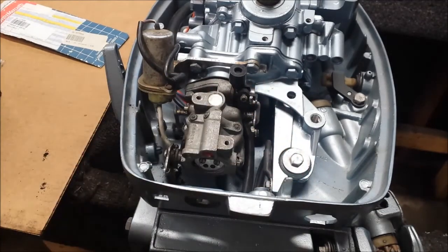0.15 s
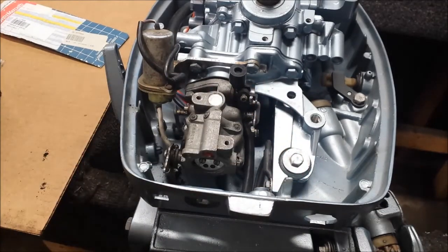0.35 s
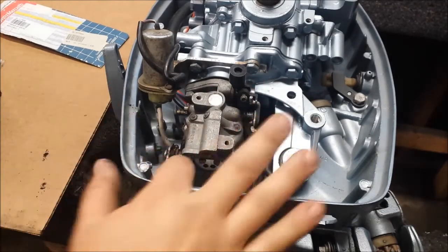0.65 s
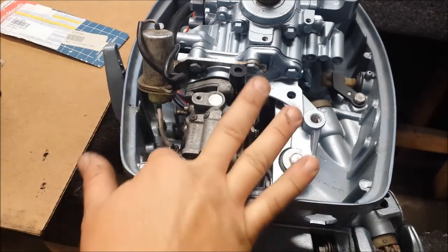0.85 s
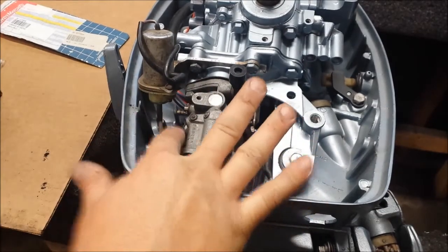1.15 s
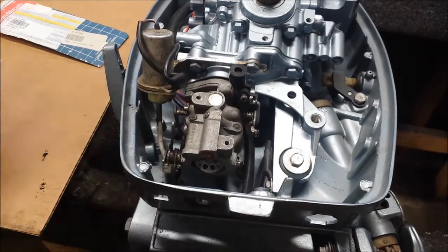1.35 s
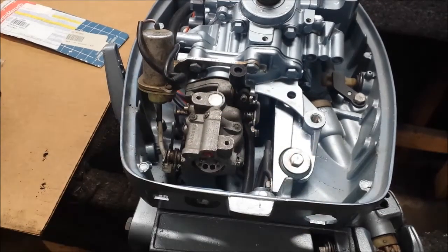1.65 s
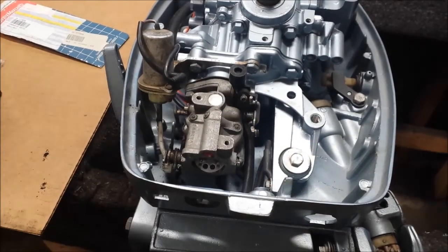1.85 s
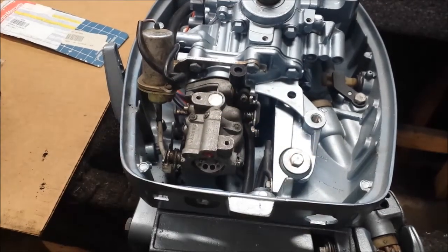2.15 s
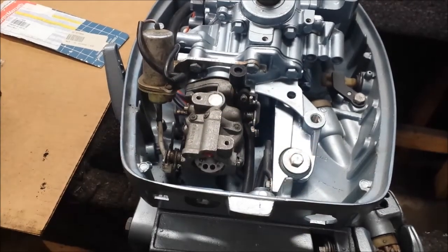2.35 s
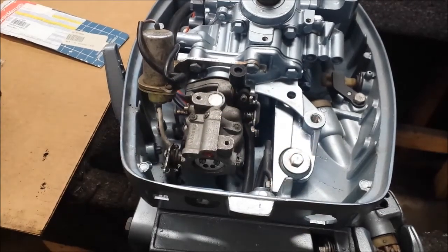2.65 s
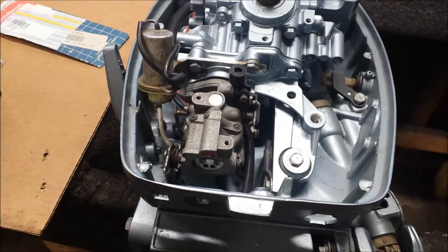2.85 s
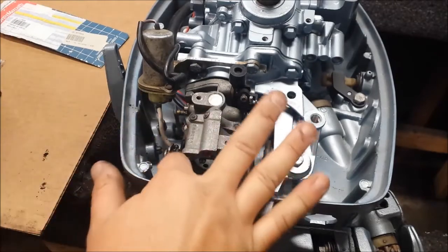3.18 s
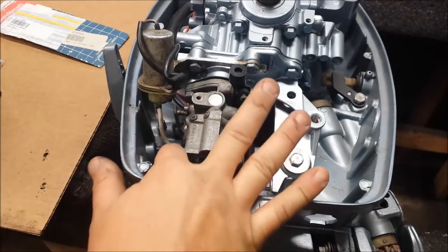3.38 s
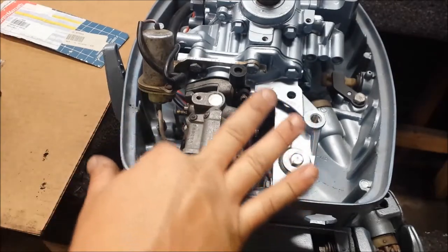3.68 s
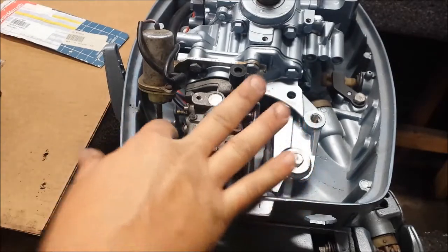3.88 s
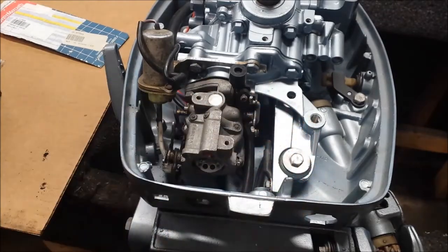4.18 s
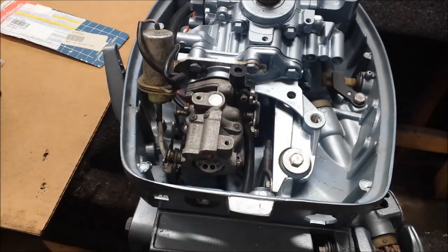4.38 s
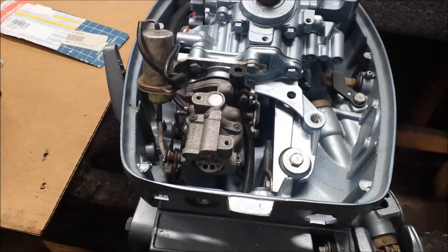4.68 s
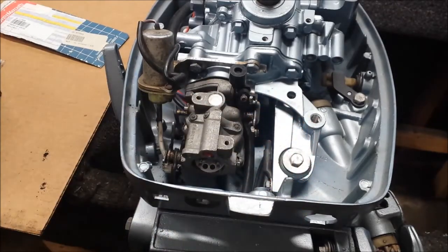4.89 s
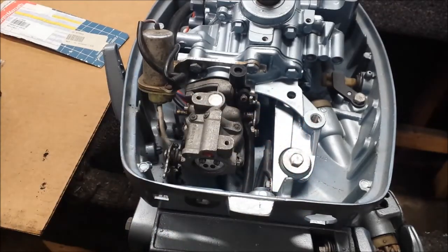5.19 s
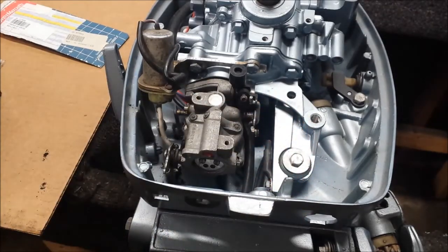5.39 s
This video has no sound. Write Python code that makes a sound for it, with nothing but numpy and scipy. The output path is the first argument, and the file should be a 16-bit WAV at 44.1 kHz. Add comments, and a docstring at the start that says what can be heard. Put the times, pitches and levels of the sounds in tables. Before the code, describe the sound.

An outboard motor's choke solenoid is heard close up in a quiet workshop, over a faint low hum and rumble. Right at the start comes the bright metallic ring of a clack already under way, then a light rattle at 0.2 seconds as the plunger drops back. The linkage squeaks faintly as a hand flips it, giving two crisp, lighter clicks at about 1.0 and 1.1 seconds. At 2.5 seconds the solenoid clacks sharply and rings briefly, with another small rattle at 2.7. Two soft knocks follow near 2.9 and 3.4 seconds. Another tiny squeak leads into a second pair of clicks at about 3.8 and 3.9 seconds. A last loud, ringing clack lands at 5.1 seconds, and the plunger rattles softly back at 5.4. The room adds only a slight echo.

```python
"""An outboard motor's choke solenoid (an electric magnet that pulls a plunger) clacks three times.
It sits close by on a workshop bench. Each time the plunger slams home, the metal rings, and about a
quarter second later the plunger drops back with a light rattle. Between pulls a hand flips the choke
linkage (its rods and joints) back with a squeak and two clicks. A faint hum fills the room."""
import sys
import numpy as np
from scipy import signal
from scipy.fft import rfft, irfft, next_fast_len
from scipy.io import wavfile
from scipy.ndimage import uniform_filter1d, map_coordinates

SR = 44100
rng = np.random.default_rng(int(sys.argv[2]) if len(sys.argv) > 2 else 0)


def unload_audio(sound):
    """Save the sound as a 16-bit wav file, at the path given as the first command line argument."""
    columns = np.transpose(np.atleast_2d(sound))
    # keep every value between -1 and 1, then stretch to whole-number steps
    steps = np.round(np.clip(columns, -1, 1) * 32767)
    wavfile.write(sys.argv[1], SR, steps.astype(np.int16))


N = 243873
T = np.arange(SR) / SR  # the second after a hit
HZ = np.fft.rfftfreq(SR, 1 / SR)  # the frequencies in a one-second sound

# The plunger pulls in: (time [s], level [dB], brightness [dB per octave], clang near 4 kHz [dB],
# metal ring [dB], rod ring [dB], chatter length [s])
PULLS = [(-.024, -8.5, 0, 4, -17, -44.5, 0.0043), (2.4514, -15, -0.5, -3.5, -21.5, -38.5, .0016),
         (5.1188, -15.5, -1, 3.5, -20.5, -51, .003)]
# The plunger is let go and drops back: (time [s], level [dB])
RELEASES = [(0.2047, -49), (2.6677, -50), (5.3773, -53.5)]
# Ringing tones of the motor's lower pan: (pitch [Hz], level [dB], time to fade by 60 dB [s])
PAN_TONES = [(120, -9, 0.46), (157.9, -3, 0.45), (261.5, -6.5, .3), (322, -14.5, .25), (655, -0.5, 0.22),
             (720, 8.5, 0.037), (795, 6, 0.031)]
# Tone colour of the rattling rods: (frequency [Hz], level [dB])
RATTLE_COLOUR = [(400, -13.5), (660, -2), (850, -4.5), (1500, -10), (2100, -4), (2700, -3.5), (3500, -12),
                 (4300, -7), (4900, -9), (5900, -4.5), (6900, -4), (7800, -13), (10000, -26), (15000, -30)]


def amp(db):
    """Turn decibels into a factor to multiply by."""
    return 10 ** (np.asarray(db) / 20)


def unit(x):
    """Scale to an average strength (rms) of 1."""
    return x / np.sqrt(np.mean(x ** 2) + 1e-20)


def along(points, hz):
    """Read values between (frequency, value) points, spacing the octaves evenly."""
    freqs, values = np.transpose(points)
    return np.interp(np.log(hz + 1), np.log(freqs + 1), values)


def add(track, s, sound):
    """Mix a sound into the track, starting at s seconds."""
    start = round(s * SR)
    part = sound[max(-start, 0):len(track) - start]
    track[max(start, 0):][:len(part)] += part


def wobble(rate):
    """A smooth random curve through `rate` random points a second."""
    return unit(map_coordinates(rng.standard_normal(N // 100), [np.arange(N) * rate / SR + 2]))


def noise(colour):
    """Steady noise with the given tone colour."""
    gain = amp(along(colour, np.fft.rfftfreq(N, 1 / SR)))
    return unit(irfft(rfft(rng.standard_normal(N)) * gain, N))


def resonances(peaks):
    """How strongly an object answers each frequency: most near its own pitches."""
    return np.sqrt(sum(amp(db) ** 2 * (HZ * width) ** 2 / ((hz * hz - HZ ** 2) ** 2 + (HZ * width) ** 2)
                       for hz, width, db in peaks))


def causal(gain):
    """A filter with this gain that rings only after a hit, never before it."""
    cepstrum = irfft(np.log(np.maximum(gain / gain.max(), 1e-5)))
    cepstrum[1:SR // 2] *= 2
    cepstrum[SR // 2 + 1:] = 0
    return np.exp(rfft(cepstrum))


def contact(body, tilt_db, hold, t60):
    """Parts chatter for `hold` seconds, fade by 60 dB in `t60` seconds and set an object sounding."""
    chatter = rfft(rng.standard_normal(SR) * amp(-60 * np.maximum(T - hold, 0) / t60))
    unevenness = np.sqrt(np.abs(uniform_filter1d(np.abs(chatter) ** 2, size=300)))
    brightness = amp(tilt_db * np.log2(HZ + 20))
    hit = irfft(chatter * causal(body * brightness / unevenness))  # a hard hit feeds all pitches evenly
    return unit(hit) * np.sqrt(.005)  # as much energy as 5 ms at strength 1


def ring(tones):
    """Struck metal rings with fading tones, in a slightly new balance every time."""
    gains = amp([db for hz, db, t60 in tones] + rng.normal(0, 2, len(tones)))
    waves = [np.sin(2 * np.pi * (hz * T + rng.random())) * amp(-60 * T / t60) for hz, db, t60 in tones]
    return gains @ waves / np.sqrt(np.sum(gains ** 2) / 2) * (1 - np.exp(-T / 0.0048))


def tail(rise):
    """A wash of noise that builds over `rise` seconds; its bass and treble die before its middle."""
    # How long sound lingers: (frequency [Hz], time to fade by 60 dB [s])
    fade_times = [(150, 0.2), (1000, 0.44), (4500, 0.43), (8000, .29), (12000, 0.31)]
    hz, t, bands = signal.stft(rng.standard_normal(SR + 256), SR, nperseg=256)
    fade = amp(-60 * t / along(fade_times, hz)[:, None])
    wash = signal.istft(bands * fade, SR, nperseg=256)[1][:SR]
    return wash * (1 - np.exp(-T / rise))


def workshop():
    """A low drone, mains buzz and a distant motor hum over rumble and hiss."""
    # Level of the whole background: hum, rumble and hiss dip and recover together,
    # as under a recorder's noise suppression: (time [s], level [dB])
    background_levels = [(0, 0), (.25, 0), (.53, -7), (.88, -5.5), (1.08, 2), (1.35, -1.5), (2.65, 0),
                         (3.6, -2.5), (3.92, 2), (4.2, -4), (4.8, -2.5), (5.06, -7), (5.28, 0.5),
                         (5.53, -3.5)]
    # The distant motor's tones: (multiple of its pitch, starting level [dB])
    motor_tones = [(.625, -60.5), (.862, -60.5), (1, -51.5)]
    # Tone colours of the room's rumble and hiss: (frequency [Hz], level [dB])
    rumble_colour = [(10, -12), (25, -12.5), (42, -13), (55, -8.5), (85, -5), (120, -7.5), (165, -8.5),
                     (250, -12.5), (400, -20.5), (750, -21.5), (1200, -27), (3000, -41), (6000, -78)]
    hiss_colour = [(500, -20.5), (1500, 1), (3000, 2), (6500, 3), (9000, 0.5), (15500, 1)]
    t = np.arange(N) / SR
    level_db = np.interp(t, *np.transpose(background_levels))
    drone_hz, mains_hz, start_hz, waver_hz = 65.7, 120, 133.3, 0.6
    eased = (1 + np.tanh(2 * (t - 2.8) / .45)) / 2  # midway the motor eases off, lower and quieter
    motor_hz = start_hz - 1.3 * t - 9.2 * eased + waver_hz * wobble(rate=4.1)
    recede_db_per_s = 1  # the motor moves away
    tones = [(drone_hz + waver_hz * wobble(rate=10), -58.5), (np.full(N, mains_hz), -65)]
    tones += [(multiple * motor_hz, db - 3.5 * eased - recede_db_per_s * t)
              for multiple, db in motor_tones]
    hum = sum(amp(db + 0.1 * wobble(rate=5.8)) * np.sin(2 * np.pi * np.cumsum(hz) / SR)
              for hz, db in tones)
    rumble = amp(-58.5 + 0.5 * wobble(rate=7)) * noise(rumble_colour)
    hiss = amp(-68) * noise(hiss_colour)
    return amp(1.5 * level_db) * hum + amp(level_db) * rumble + amp(.62 * level_db) * hiss


def room(sound, echo_db):
    """The bench and walls add a faint echo to a close sound."""
    # Tone colour of the echo: (frequency [Hz], level [dB])
    wall_colour = [(200, 4), (700, 3), (1100, 0.5), (1600, 2.5), (2200, -3.5), (2750, -8.5), (3600, -4),
                   (8000, -0.5)]
    echo = tail(rise=0.0037)
    echo = irfft(rfft(echo / np.linalg.norm(echo)) * causal(amp(along(wall_colour, HZ))))
    return sound + amp(echo_db) * signal.fftconvolve(sound, echo)[:N]


def pivot():
    """The dry pivot sticks and slips as it turns, squeaking at a wavering pitch."""
    # The pivot's squeaks: (middle time [s], length [s], level [dB])
    squeaks = [(0.755, 0.11, -77), (.893, 0.079, -65.5), (1.225, .06, -65), (3.466, .08, -77),
               (3.722, .16, -68.5)]
    # The pivot's own pitches: (pitch [Hz], width [Hz], level [dB])
    pivot_peaks = [(1630, 100, -13), (2630, 600, -21), (6240, 650, -22)]
    out = np.zeros(N)
    for s, length, db in squeaks:
        rub = unit(irfft(rfft(rng.standard_normal(SR)) * resonances(pivot_peaks) ** 2))
        pitch = pivot_peaks[0][0] + 25 * unit(uniform_filter1d(rng.standard_normal(SR), size=300))
        squeal = np.sin(2 * np.pi * np.cumsum(pitch) / SR)
        swell = np.sin(np.pi * np.minimum(T / length, 1))
        add(out, s - length / 2, amp(db) * (squeal + 0.88 * rub) * swell)
    return out


def tick(tilt_db):
    """The rods touch lightly and chatter on briefly; a higher tilt_db sounds brighter."""
    rods = amp(along(RATTLE_COLOUR, HZ))
    touch = contact(rods, tilt_db, hold=.001, t60=.012)
    return touch + amp(0.5) * contact(rods, tilt_db, hold=.002, t60=.07)


def rattles():
    """The plunger slides in and later drops back; loose joints tick, and something knocks softly."""
    # Ticks of loose joints: (time [s], level [dB], brightness [dB per octave])
    joint_ticks = [(.258, -64, 8), (1.332, -66.5, 3), (3.833, -55, 0.5), (4.0947, -65.5, 7)]
    # Soft knocks nearby: (time [s], level [dB])
    knocks = [(.424, -63), (2.9204, -50.5), (3.416, -57)]
    # Tone colour of a knock: (frequency [Hz], level [dB])
    knock_colour = [(300, -23), (700, 9), (1100, 2.5), (1900, -4), (2800, -26), (8000, -38.5)]
    out = np.zeros(N)
    dull_scrape = amp(along(RATTLE_COLOUR, HZ)) / np.sqrt(1 + (HZ / 2400) ** 6)
    for s, db, *_ in PULLS:
        add(out, s - .0188, amp(db - 38) * tick(tilt_db=-1))  # the rods stir just before the pull
        add(out, s - .0054, amp(db - 25.5) * contact(dull_scrape, 0, hold=0.0019, t60=0.036))
    for s, db in RELEASES:
        add(out, s - .005, amp(db - 12) * tick(tilt_db=0.4))  # the plunger comes loose
        for delay, drop_db in [(0, 0), (0.014, -3)]:  # it lands and bounces once
            thud = amp(-5.5) * ring(PAN_TONES[:-2])  # too light for the pan's hollow knock
            add(out, s + delay, amp(db + drop_db) * (tick(tilt_db=0.8) + thud))
    for s, db, tilt_db in joint_ticks:
        add(out, s, amp(db) * tick(tilt_db))
    for s, db in knocks:
        add(out, s, amp(db) * contact(amp(along(knock_colour, HZ)), 0, hold=0.0014, t60=0.092))
    return out


def linkage():
    """Pushed by hand, the linkage snaps off its catch and lands on its stop, shaking the pan."""
    # Snaps off the catch: (time [s], level [dB], brightness [dB per octave], hollowness [dB])
    snaps = [(0.9525, -32, 3.5, 1.5), (3.7586, -33.5, -0.5, -7)]
    # Landings on the stop: (time [s], level [dB])
    landings = [(1.1075, -32.5), (3.885, -32)]
    # The catch's and the stop's own pitches: (pitch [Hz], width [Hz], level [dB])
    catch_peaks = [(1010, 110, -8.5), (1188, 85, 1.5), (1560, 160, -3), (1990, 260, -21), (2650, 150, 5),
                   (2700, 67, 1), (4555, 200, -1.5), (5150, 190, -3), (6300, 650, -9.5), (7430, 790, -10.5),
                   (8710, 600, -24), (12470, 1100, -36)]
    stop_peaks = [(413, 30, -12), (693, 23, 1.5), (724, 47, -1), (1096, 60, -4.5), (1234, 20, -8),
                  (2010, 140, -13), (2300, 180, -10), (2680, 230, 0), (2940, 160, -4), (3460, 100, -15),
                  (4500, 180, -11), (5760, 910, -12), (6775, 930, -16.5), (13090, 2500, -23)]
    out = np.zeros(N)
    catch = resonances(catch_peaks) * amp(along([(300, -29), (900, 13), (7000, -1.5), (11000, -5)], HZ))
    stop = resonances(stop_peaks) * amp(along([(200, -1.5), (700, -0.5), (6500, 0), (10000, -8.5)], HZ))
    hollow = np.exp(-(np.log2((HZ + 1) / 1580) / 0.18) ** 2)
    for s, db, tilt_db, hollow_db in snaps:
        struck = catch * amp(hollow_db * hollow)
        add(out, s, amp(db) * contact(struck, tilt_db, hold=0.00088, t60=0.011))
        # loose joints chatter on; a power below 1 makes them ring less
        add(out, s + 0.0059, amp(db - 12) * contact(struck ** 0.85, tilt_db, hold=0.0088, t60=0.033))
    for s, db in landings:
        click = contact(stop, 0, hold=0.0006, t60=0.028)
        add(out, s, amp(db) * (click + amp(-5) * ring(PAN_TONES)))
        add(out, s + 0.014, amp(db - 16.5) * contact(stop ** 0.61, 0, hold=.003, t60=0.053))
    return out


def solenoid():
    """The plunger slams home and leaves the metal ringing until it drops back and damps the ring."""
    # The solenoid body's own pitches: (pitch [Hz], width [Hz], level [dB])
    body_peaks = [(703, 100, -18.5), (850, 40, -7), (1014, 46, 0.5), (1183, 64, -2), (1510, 71.6, -6),
                  (2050, 110, -13), (2400, 150, -8), (2850, 200, -5), (3860, 44, -8.5), (4570, 280, 0.5),
                  (4390, 130, 2.5), (5023, 69, 0), (5310, 180, -1), (6630, 300, -7), (6500, 150, -5),
                  (7580, 180, 2.5), (8320, 530, -1), (8800, 120, -6), (10700, 1300, -18.5),
                  (12700, 2000, -13.5), (14730, 400, -18.5)]
    # Tones of the metal casting and the choke rods: (pitch [Hz], level [dB], time to fade by 60 dB [s])
    metal_tones = [(2837, -17, 0.33), (3257, -26, 0.49), (3844, 0, 0.23), (3908, -11, 0.45),
                   (4021, -13, 0.38), (4371, -20, 0.76), (4425, -13, 0.3), (4468, -15, 0.5),
                   (4613, -14, 0.57), (4786, -8, 0.39), (4867, -14, 0.59), (4920, -9, 0.36),
                   (4980, -15, 0.37), (5254, -17, 0.39), (5480, -6, 0.21), (5992, -18, 0.38),
                   (6315, -17, 0.35), (6584, -18, 0.29), (6939, -12, 0.18), (7144, -17, 0.28),
                   (7693, -13, 0.24), (7930, -10, 0.24), (8129, -12, 0.29), (8274, -4, 0.22),
                   (8506, -12, 0.2), (8640, -20, 0.3)]
    rod_tones = [(1014, -2, 0.31), (1628, 0.5, 0.15), (2550, 0, 0.14), (3816, -1, 0.33), (4620, -7, 0.49),
                 (5480, 2, 0.28)]
    # The casting's many crowded tones, heard as a wash: (frequency [Hz], level [dB])
    wash_colour = [(400, -19), (700, -18.5), (980, -7), (1250, -8.5), (1600, -15), (1950, -22),
                   (2700, -11.5), (3500, -18.5), (3850, -6), (4900, -5.5), (5900, -11.5), (6500, -9.5),
                   (7300, -11.5), (8300, 0), (9800, -24), (15000, -30.5)]
    damping_db_per_s = 80
    out = np.zeros(N)
    body_colour = [(300, -12), (900, 0.5), (8800, 2), (9800, -8.5), (12500, -2), (15000, 3)]
    body = resonances(body_peaks) * amp(along(body_colour, HZ))
    clang = np.exp(-(np.log2((HZ + 1) / 3900) / .55) ** 2)  # how squarely it lands sets this band
    softer = 1 / np.sqrt(1 + (HZ / 8500) ** 8)  # lighter hits lack the highest treble
    for (s, db, tilt_db, clang_db, ring_db, rods_db, chatter), (release_s, _) in zip(PULLS, RELEASES):
        struck = body * amp(clang_db * clang)
        # the plunger takes up its slack, slams home and bounces once
        add(out, s - .0015, amp(db - 15.5) * contact(struck * softer, tilt_db + 2, .00087, t60=.00538))
        add(out, s, amp(db) * contact(struck, tilt_db, hold=chatter, t60=.008))
        add(out, s + .014, amp(db - 15) * contact(struck * softer, tilt_db + 1, hold=.003, t60=.014))
        colour = amp(along(wash_colour, HZ) + tilt_db * np.log2(HZ + 20) + clang_db * clang)
        wash = irfft(rfft(tail(rise=.003)) * unit(colour))
        ringing = amp(ring_db - 16) * (wash + ring(metal_tones)) + amp(rods_db) * ring(rod_tones)
        add(out, s, ringing * amp(-damping_db_per_s * np.maximum(s + T - release_s, 0)))
        add(out, s, amp(db - 33) * ring(PAN_TONES))  # the jolt reaches the pan
    return out


def scene():
    """Mix the close sounds and their echoes with the workshop background, in one channel."""
    clacks = room(solenoid(), echo_db=-14.5)
    clicks = room(linkage(), echo_db=-8.5)
    small_sounds = room(rattles() + pivot(), echo_db=-12)
    return (clacks + clicks + small_sounds + workshop())[None]


def record(dry):
    """Cut away the very highest treble."""
    top_hz = 15800
    padded = next_fast_len(N + SR)
    passed = 1 / np.sqrt(1 + (np.fft.rfftfreq(padded, 1 / SR) / top_hz) ** 200)
    return irfft(rfft(dry, padded) * passed, padded)[:, :N]


dry = scene()
out = record(dry)
unload_audio(out)
```